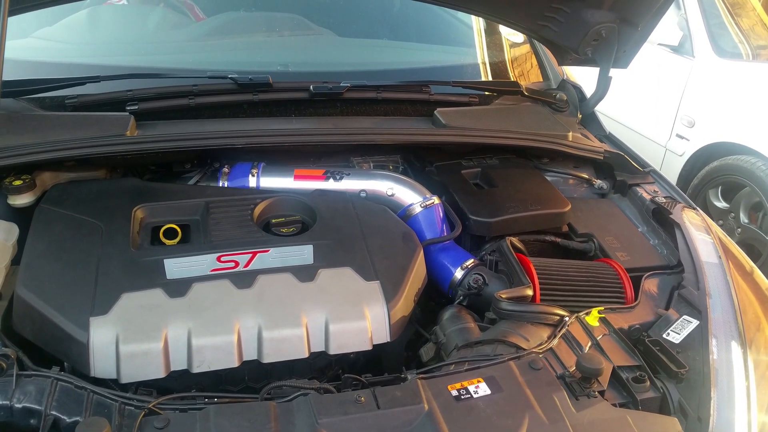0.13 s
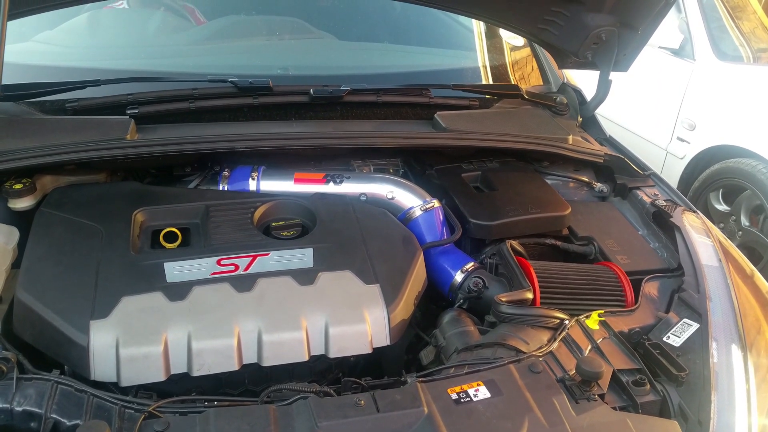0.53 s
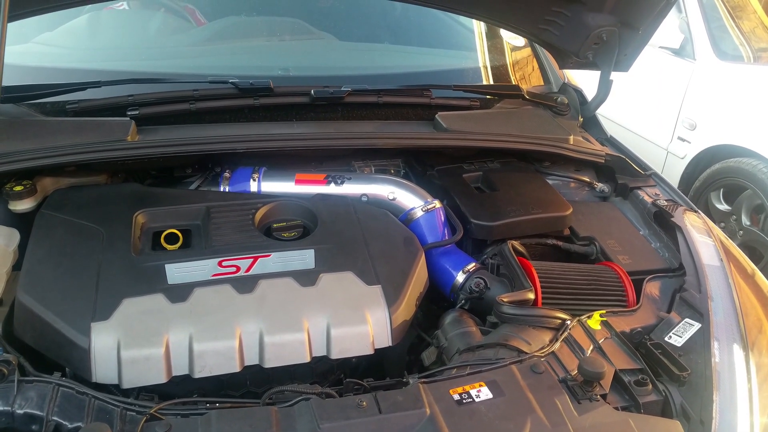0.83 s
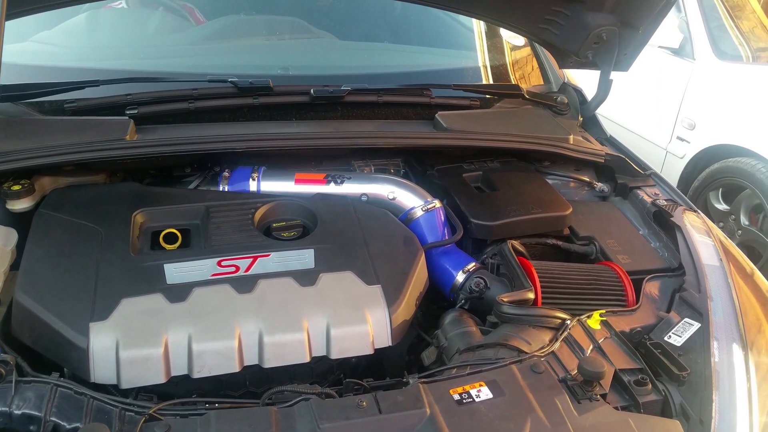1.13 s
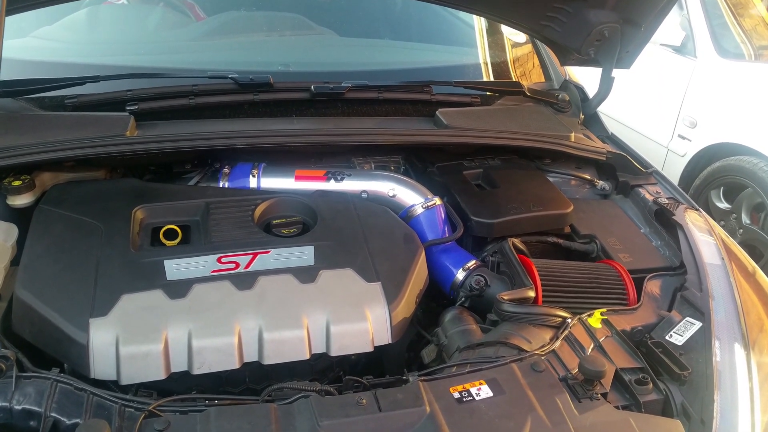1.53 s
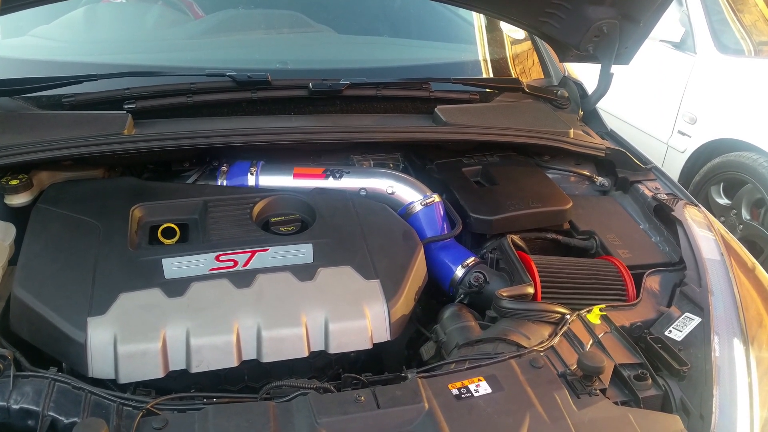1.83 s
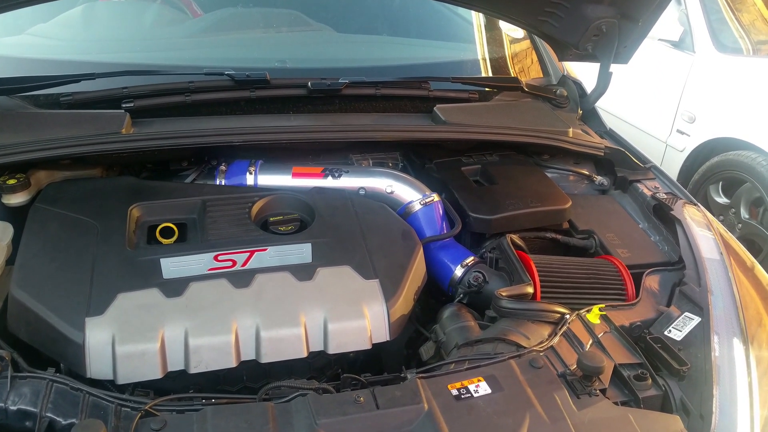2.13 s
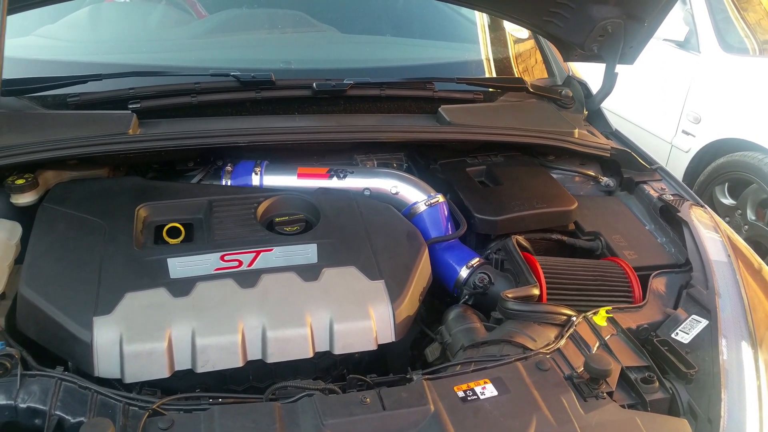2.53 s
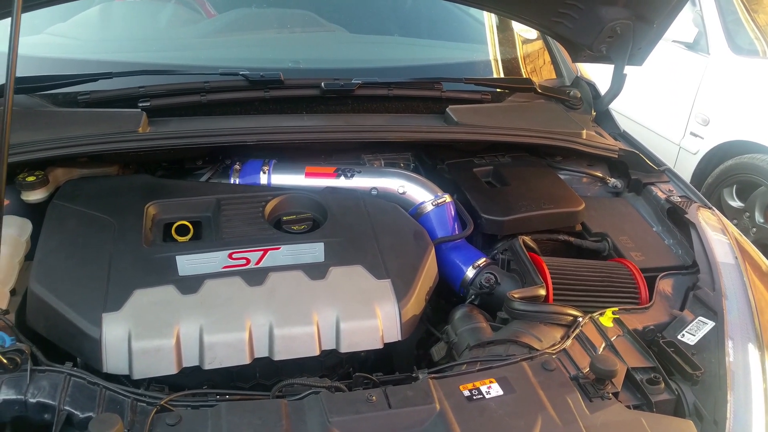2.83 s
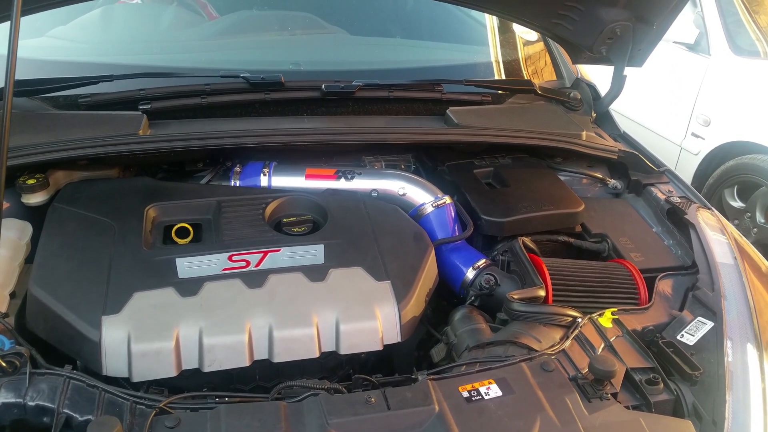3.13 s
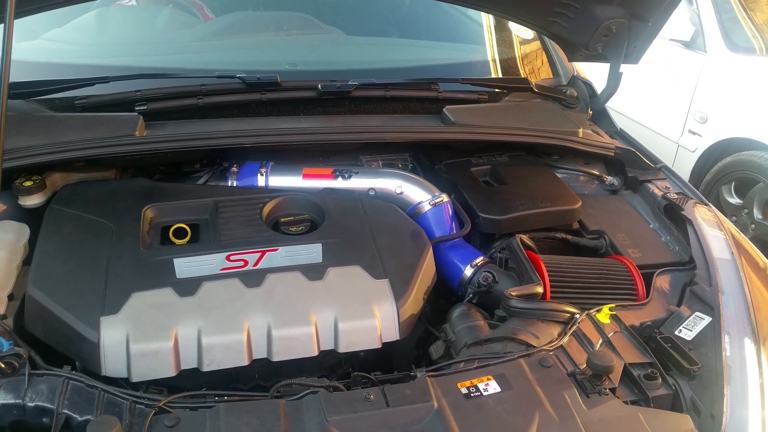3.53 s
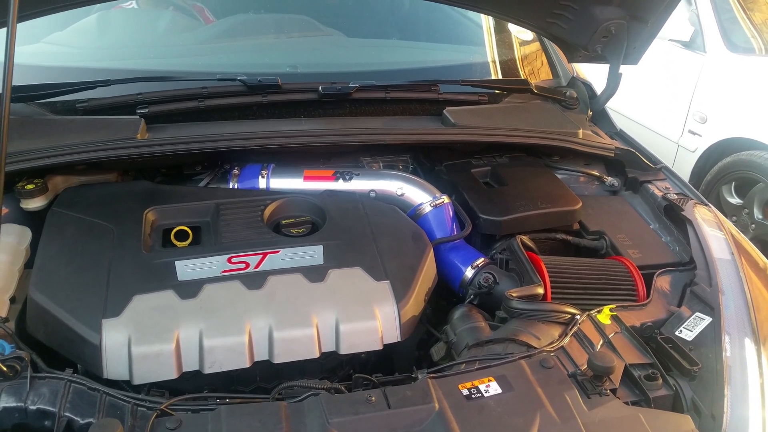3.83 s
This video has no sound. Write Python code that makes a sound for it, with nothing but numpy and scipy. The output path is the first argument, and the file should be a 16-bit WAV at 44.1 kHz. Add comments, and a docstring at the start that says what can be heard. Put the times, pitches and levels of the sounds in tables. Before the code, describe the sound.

A dog barks sharply and repeatedly over a car engine settling from a rev to idle.

```python
"""A dog's bark, already under way, over a fast-running engine that settles from a blip back to idle.
The engine, under an open bonnet, is filtered noise and tones that follow its turning: roar, clatter and hiss,
with injector and pump ticks coming out as it slows.
Each bark starts as a clean yelp built from sine waves and breaks into a rasp of noise through a ringing throat.
The yard throws the barks back as many scattered echoes."""
import sys
import numpy as np
from scipy import signal
from scipy.io import wavfile
from scipy.ndimage import uniform_filter1d

SR = 44100
rng = np.random.default_rng(int(sys.argv[2]) if len(sys.argv) > 2 else 0)


def persist_wave(psi):
    """Save psi, clipped to +-1, as 16-bit WAV."""
    counts = np.round(np.clip(psi, -1, 1) * 32767).astype(np.int16)
    wavfile.write(sys.argv[1], SR, np.atleast_2d(counts).T)


N = 176400  # length in samples


def amp(db):
    """Turn decibels into a multiplier for the wave."""
    return 10 ** (np.asarray(db) / 20)


def unit(x):
    """Scale a signal to an average (RMS) strength of 1."""
    return x / np.sqrt(np.mean(x ** 2) + 1e-20)


def soft_step(x, width):
    """Rise smoothly from 0 to 1 around x = 0; a negative width makes it fall."""
    return 1 / (1 + np.exp(-x / width))


def read(points, hz):
    """Look up a table of frequencies, sliding between rows on a logarithmic scale."""
    f, value = np.transpose(points)
    return np.interp(np.log(hz + 1), np.log(f + 1), value)


def curve(table, column):
    """Turn one column of a timed table into a line with a value for every sample."""
    rows = np.array(table)
    return np.interp(np.arange(N) / SR, rows[:, 0], rows[:, column])


def ring(x, modes):
    """Parallel resonances, each with its listed gain at its centre."""
    return sum(amp(db) * signal.lfilter(*signal.iirpeak(hz, hz / width, SR), x) for hz, width, db in modes)


def band_filter(order, hz, kind):
    """Design a filter that keeps one range of frequencies."""
    return signal.butter(order, hz, kind, fs=SR, output="sos")


# How alike left and right are: (frequency [Hz], likeness [0-1])
LIKENESS = [(60, 1), (290, 0.98), (630, 0.96), (1300, 0.96), (2300, 0.29), (4500, 0.26), (14500, 0.094)]
# Stereo balance: (frequency [Hz], left minus right [dB])
BALANCE = [(60, 4), (120, 0), (240, 3), (470, 2.5), (930, 2.5), (1850, 13.5), (3680, 2.5), (7300, -3.5),
           (14500, 3)]
ENGINE_LAG_S = 0.00018  # the right microphone hears the engine later


def noise(shape, patch_db=2):
    """Two-channel noise with a given spectrum, whose strength drifts in patches of time and pitch."""
    frames, hz = N // 256 + 5, np.fft.rfftfreq(1024, 1 / SR)
    a, b, c, d, patch = rng.standard_normal((frames, 513, 5)).T
    patch = uniform_filter1d(patch, size=10, axis=0)
    patch = unit(uniform_filter1d(patch, size=10, axis=1))
    same = np.clip(read(LIKENESS, hz), -1, 1)[:, None]
    left, other = a + 1j * b, c + 1j * d
    delay = np.exp(-2j * np.pi * hz * ENGINE_LAG_S)[:, None]
    right = same * left * delay + np.sqrt(1 - same ** 2) * other
    balance_db = np.multiply.outer([.5, -.5], read(BALANCE, hz))[..., None]
    z = np.array([left, right]) * amp(read(shape, hz)[:, None] + patch_db * patch + balance_db)
    return unit(signal.istft(z, nperseg=1024, noverlap=768)[1][:, :N])


# Engine speed; four firings to a cycle: (time [s], speed [cycles per s])
SPEED = [(0, 13.807), (0.26, 13.502), (0.5, 13.074), (0.77, 12.457), (1, 11.729), (1.29, 10.831),
         (1.65, 9.878), (2.03, 8.989), (2.58, 8.096), (2.99, 7.516), (3.4, 7.272), (4, 7.06)]


def engine():
    """Adding up the speed gives the place in the cycle, which times the throbs, ticks and tones."""
    t, cycles = np.arange(N) / SR, np.cumsum(curve(SPEED, column=1)) / SR
    return (roar(cycles) + clatter_and_ticks(t, cycles) + intake_hiss(t, cycles) + hum_and_whine(cycles)
            + exhaust_pops(t) + loose_click())


# Engine levels: (time [s], rumble level [dB], roar level [dB], firing hum level [dB])
ENGINE_LEVELS = [(0, -27, -15, -65), (.12, -31, -18, -46), (.25, -28, -18, -36.5), (.45, -32.5, -20.5, -58),
                 (.55, -33.5, -25, -40), (.79, -30.5, -25, -48.5), (.97, -34.5, -28.5, -49),
                 (1.25, -36, -33, -44.5), (1.45, -44.5, -31, -52), (1.65, -38.5, -32, -41),
                 (1.9, -45.5, -31, -41), (2.05, -46.5, -32, -44), (2.4, -50, -40, -49.5),
                 (3, -52.5, -38, -51.5), (4, -54.5, -42.5, -49)]
# Colour of the roar: (frequency [Hz], level [dB])
ROAR_COLOUR = [(15, -61), (25, -54), (60, -40), (100, -14.5), (230, -4), (270, -27), (344, -5.5),
               (654, -9.5), (1420, -0.5), (4370, -15), (7460, -39), (12700, -32), (15000, -54)]
# Booming resonances of the roar: (frequency [Hz], width [Hz], relative level [dB])
ROAR_BOOM = [(332, 35, -4), (235.6, 26, -9.5), (1520, 42, -18.5), (905, 140, -9.5)]
THROB_DB, SPLIT_HZ = 0.5, 450  # swing with each firing; rumble below the split, roar above
BOOM_LUMP_DB, BOOM_AT = 1.5, 0.48  # the boom swells once a cycle, at this place in it [0-1]


def roar(cycles):
    """Noise that throbs with the firings and excites a few resonances; low and high parts have own levels."""
    source = noise(ROAR_COLOUR)
    lump = amp(BOOM_LUMP_DB * np.cos(2 * np.pi * (cycles - BOOM_AT)))
    boom = 3 * lump * ring(source, ROAR_BOOM)
    full = amp(THROB_DB * np.cos(8 * np.pi * cycles)) * (source + boom)
    low = signal.sosfiltfilt(band_filter(3, SPLIT_HZ, "low"), full)
    rumble = amp(curve(ENGINE_LEVELS, column=1)) * unit(low)
    return rumble + amp(curve(ENGINE_LEVELS, column=2)) * unit(full - low)


TICK_HOLD_S, TICK_SPREAD_DB = 0.013, 1.2


def bursts(turns, db, decay_s):
    """An envelope that jumps up, holds and decays at each whole turn, a little uneven in strength."""
    new_turn = np.diff(np.floor(turns), prepend=np.floor(turns[0]))
    hit = new_turn * amp(db + TICK_SPREAD_DB * rng.standard_normal(N))
    hold = 1. * (np.arange(SR // 20) < TICK_HOLD_S * SR)
    held = hit + signal.oaconvolve(hit, hold)[:N] / (decay_s * SR)
    decaying = signal.lfilter([1], [1, -np.exp(-1 / (decay_s * SR))], held)
    return uniform_filter1d(decaying, size=40)


# Resonances rung by the injectors: (frequency [Hz], width [Hz], relative level [dB])
INJECTOR_RING = [(2354, 87, 4), (4125, 130, 0), (3400, 130, -16.5), (4740, 82, -15.5)]
# Clear notes of each tick: (frequency [Hz], relative level [dB])
TICK_NOTES = [(2330, -3), (4140, 0)]
PING_DRIFT = .06  # phase drift [radians a sample]


def injector_ticks(t, strokes, flat):
    """Bursts of ringing noise plus drifting clear notes, both shaped by the strokes."""
    rattle = ring(strokes * noise(flat, patch_db=-3.0), INJECTOR_RING)
    drift = PING_DRIFT * np.cumsum(rng.standard_normal((2, N)), axis=1)
    notes = sum(amp(db) * np.sin(2 * np.pi * hz * t + drift) for hz, db in TICK_NOTES)
    return unit(rattle) + unit(strokes) * notes


# Fuel pump parts: (lag [cycles], relative level [dB], frequency [Hz], width of each filter [Hz])
PUMP = [(-0.027, -1.5, 5250, 950), (-0.062, -8.5, 12800, 3700)]
PUMP_S = .004  # decay of a pump tick


def pump_ticks(cycles, flat):
    """Three lobes a cycle give noise bursts, each part filtered twice around its own frequency."""
    white, total = noise(flat, patch_db=1), 0
    for lag, db, hz, width in PUMP:
        burst = bursts(3 * (cycles - lag), db, PUMP_S) * white
        total = total + ring(ring(burst, [(hz, width, 0)]), [(hz, width, 0)])
    return total


# Colour of the clatter: (frequency [Hz], level [dB])
CLATTER_COLOUR = [(15, -40), (25, -7.5), (196, -16), (335, -17), (393, -29.5), (500, 2), (572, -12),
                  (636, -5.5), (690, -8), (1460, -11), (2060, -11.5), (4140, -9.5), (7260, -32),
                  (11800, -23), (15000, -41.5)]
# Casing resonances rung by the clatter: (frequency [Hz], width [Hz], relative level [dB])
CASING = [(511, 15, -19.5), (1340, 24, -31), (1500, 15, -7), (2330, 57, -10), (4060, 66, -15)]
# Injector ticks: (place in the cycle [0-1], relative level [dB])
INJECTOR_TICKS = [(0.91, 2.5), (.27, -3), (.19, -9), (0.5, 2.5)]
# Shared level of clatter and ticks, before their own boosts: (time [s], level [dB])
CLATTER_LEVEL = [(0, -35), (.25, -34), (.47, -31.5), (.52, -34), (.95, -35), (1.1, -35.5), (1.4, -37),
                 (1.62, -35.5), (1.95, -34), (2.03, -38.5), (2.3, -39.5), (2.9, -40), (3.2, -39),
                 (3.6, -40), (4, -39.5)]
CLATTER_DB, INJECT_DB = 6.5, 1  # boosts of the clatter and of the injector ticks
INJECT_S, INJECT_SHAKE = 0.0032, 0.61  # decay of a tick; how strongly it also shakes the clatter
TICKS_FROM_S, TICKS_FADE_S = 1.3, 0.93  # middle and time constant of the ticks' slow rise


def clatter_and_ticks(t, cycles):
    """Noise rings the casing; injector and pump ticks gradually come out and share its level."""
    flat = [(20, 0), (20000, 0)]
    showing = soft_step(t - TICKS_FROM_S, TICKS_FADE_S)
    strokes = sum(bursts(cycles - at, db, INJECT_S) for at, db in INJECTOR_TICKS)
    clatter = unit(noise(CLATTER_COLOUR) * (1 + INJECT_SHAKE * showing * strokes))
    clatter = amp(CLATTER_DB) * (clatter + 3 * ring(clatter, CASING))
    injectors = amp(INJECT_DB) * unit(injector_ticks(t, strokes, flat))
    ticks = (injectors + 4 * pump_ticks(cycles, flat)) * showing
    return amp(curve(CLATTER_LEVEL, column=1)) * (clatter + ticks)


# Colour of the intake hiss: (frequency [Hz], level [dB])
PUFF_COLOUR = [(1760, -33), (3000, -11), (4640, 9), (7430, -8.5), (12700, 0), (15000, -42)]
PUFF_DB, PUFF_DEPTH_DB = -35.5, 6  # middle level and swing either way
PUFF_AT, PUFF_END_S = 0.24, 0.49  # loudest place in the cycle [0-1]; middle of the fade-out


def intake_hiss(t, cycles):
    """Noise that swells once a cycle and soon fades away."""
    level_db = PUFF_DB + PUFF_DEPTH_DB * np.cos(2 * np.pi * (cycles - PUFF_AT))
    return amp(level_db) * soft_step(t - PUFF_END_S, -0.071) * noise(PUFF_COLOUR)


# Gear whine: (time [s], level [dB])
WHINE_LEVEL = [(0, -60), (1.45, -52), (1.65, -39), (1.9, -40), (2.2, -47), (2.5, -42), (2.75, -41),
               (2.95, -42), (3.3, -48), (4, -50)]
WHINE_ORDER, HUM_SECOND_DB = 80, -5  # whine waves per cycle; second hum tone against the first


def hum_and_whine(cycles):
    """Sine waves locked to the engine: a hum at the firing rate and its double, and a high gear whine."""
    hum = np.sin(8 * np.pi * cycles) + amp(HUM_SECOND_DB) * np.sin(16 * np.pi * cycles)
    whine = np.sin(2 * np.pi * WHINE_ORDER * cycles)
    hum = amp(curve(ENGINE_LEVELS, column=3)) * hum
    return np.sqrt(2) * (amp(curve(WHINE_LEVEL, column=1)) * whine + hum)


# Uneven exhaust thumps after the blip: (time [s], level [dB])
POPS = [(0.072, -16.5), (0.096, -20), (0.149, -18), (0.175, -16), (0.223, -18), (0.306, -32), (0.361, -21),
        (0.402, -22), (0.462, -19), (0.581, -29), (0.684, -20.5), (0.874, -32)]
POP_HZ, POP_RISE_S, POP_FALL_S = 336.6, 0.0163, 0.009


def exhaust_pops(t):
    """Short thumps of the exhaust pipe's resonance, each slightly different in pitch."""
    out = np.zeros(N)
    for (middle_s, db), (bend, phase) in zip(POPS, rng.standard_normal((len(POPS), 2))):
        u = np.maximum(t - middle_s + POP_RISE_S / 2, 0)  # the listed time is the middle of the rise
        rise = np.sin(np.pi / 2 * np.minimum(u / POP_RISE_S, 1)) ** 2
        fall = np.exp(-np.maximum(u - POP_RISE_S, 0) / POP_FALL_S)
        out += amp(db) * rise * fall * np.sin(2 * np.pi * POP_HZ * (1 + 0.032 * bend) * u + phase)
    return out


# Resonances of the click: (frequency [Hz], width of each filter [Hz], gain of each filter [dB])
CLICK_RING = [(2500, 650, 0), (3300, 700, -5)]
CLICK_S, CLICK_DB = 2.4506, 9  # time; height of the impulse before the filters


def loose_click():
    """One loose click: a single impulse rung twice through the same resonances."""
    impulse = amp(CLICK_DB) * (np.arange(N) == round(CLICK_S * SR))
    return ring(ring(impulse, CLICK_RING), CLICK_RING)


# Throat resonances: (frequency [Hz], width [Hz], relative level [dB])
THROAT = [(538, 46, -6.5), (686, 73, 3), (898, 104, 0), (992, 110, 3), (1200, 110, -4.5), (1440, 135, -4),
          (1755, 115, -2.5), (2017, 51, -9.5)]
THROAT_SPREAD = .03  # share by which the throat's frequencies vary from bark to bark
SLAPS_PER_S, SLAP_SPREAD_DB, SLAP_SHARE = 600, 3.5, .5  # irregular slaps of the vocal folds
RASP_RISE_S, RASP_SAG_DB, GRIT_DB = .022, -11, 2.8


def rasp_sound(t, rasp_db, from_s, end_s):
    """Gritty noise and irregular slaps of the vocal folds ring the throat, then sag and stop."""
    grit, hiss = rng.standard_normal((2, len(t)))
    slaps = amp(SLAP_SPREAD_DB * hiss) * (rng.random(len(t)) < SLAPS_PER_S / SR)
    gate = amp(GRIT_DB * unit(uniform_filter1d(grit, size=160)))
    shifts = rng.standard_normal((len(THROAT), 2))
    throat = [(hz * (1 + THROAT_SPREAD * z), width, db + 1.4 * v)
              for (hz, width, db), (z, v) in zip(THROAT, shifts)]
    folds = (1 - SLAP_SHARE) * unit(gate * hiss) - SLAP_SHARE * unit(slaps)
    rasp = unit(signal.sosfilt(band_filter(7, [430, 2250], "band"), ring(folds, throat)))
    shape = np.clip((t - from_s) / RASP_RISE_S, 0, 1) * soft_step(t - end_s, -.005)
    sag = np.clip((t - from_s - RASP_RISE_S) / end_s, 0, 1)
    return rasp * shape * amp(rasp_db + RASP_SAG_DB * sag)


def slow_wobble(count):
    """Random wandering, smoothed twice so only slow changes are left."""
    chance = uniform_filter1d(rng.standard_normal(count), size=170)
    return unit(uniform_filter1d(chance, size=170))


# Second and third partials of the yelp, against the first: level [dB]
UPPER_PARTIALS_DB = [-16.5, -13.5]
# Half-pitch tones from strong-weak pulsing: (multiple of the pitch, relative level [dB])
HALVES = [(1.5, 0), (2.5, -9)]
# Barks, inner times counted from each start: (start [s], top pitch [Hz], swell time [s], yelp end [s],
# yelp level [dB], growth: level early in the yelp against its end [dB], half-pitch level [dB],
# squeak level [dB], fourth partial level [dB], rasp level [dB], rasp start [s], rasp end [s])
BARKS = [(-.02, 696, 0.021, 0.066, -18, -7.5, -35, -36, -48, -20.5, 0.037, 0.13),
         (0.481, 723, 0.023, 0.056, -13.5, -4, -14, -29, -43, -13.5, 0.05, 0.14),
         (0.976, 695, 0.027, .082, -12, -7, -17.5, -22, -38, -13, 0.043, 0.14),
         (1.46, 681.6, 0.023, 0.059, -9, -5, -18, -23, -43, -12, 0.038, 0.12),
         (1.962, 720, 0.032, 0.065, -9, -1.5, -16, -21, -40, -15, 0.053, .14),
         (2.913, 709.7, 0.026, 0.0664, -12, -6.5, -21, -23, -35, -12.5, 0.038, 0.13),
         (3.309, 664.4, 0.027, 0.08, -10, -4.5, -19, -21.5, -34.5, -15.5, .045, .14),
         (3.717, 672, 0.023, 0.045, -12, -5, -19, -42, -47, -11.5, 0.043, 0.14)]
SCOOP, SCOOP_S = .18, .013  # the pitch starts this share too low and rises with this time constant
WOBBLE_DB, WOBBLE_PITCH = 2, .014  # random wobble of level [dB] and pitch [share]
SQUEAK_S, SQUEAK_RISE_S = .026, .007
HALVES_FROM_S, FOURTH_AT_S, FOURTH_S = .045, .03, .014


def bark(start, top_hz, swell_s, yelp_s, yelp_db, growth_db, half_db, squeak_db, fourth_db, rasp_db,
         rasp_from_s, rasp_end_s):
    """Pitch scoops up; the second partial speaks first, the first swells, half-pitch tones and rasp follow."""
    t = np.arange(0, .25, 1 / SR)
    pitch_change = WOBBLE_PITCH * slow_wobble(len(t)) - SCOOP * np.exp(-t / SCOOP_S)
    turns = np.cumsum(top_hz * (1 + pitch_change)) / SR

    def partial(k):
        return np.sin(2 * np.pi * k * turns)

    hold = soft_step(t - yelp_s, -.0025)
    growth = growth_db * np.clip((yelp_s - t) / (yelp_s - swell_s), 0, 1)
    onset = np.minimum(t / SQUEAK_RISE_S, 1)
    swell = amp(yelp_db + WOBBLE_DB * slow_wobble(len(t)) + growth) * hold
    swell *= amp(-18) * onset + soft_step(t - swell_s, 0.002)
    upper = sum(amp(db) * partial(k) for k, db in enumerate(UPPER_PARTIALS_DB, start=2))
    yelp = swell * (partial(1) + upper)
    halves = sum(amp(db) * partial(k) for k, db in HALVES)
    halves = amp(half_db) * hold * soft_step(t - HALVES_FROM_S, 0.0029) * halves
    squeak = amp(squeak_db) * onset * np.exp(-(t / SQUEAK_S) ** 2) * partial(2)
    fourth = amp(fourth_db) * np.exp(-((t - FOURTH_AT_S) / FOURTH_S) ** 2) * partial(4)
    rasp = rasp_sound(t, rasp_db, rasp_from_s, rasp_end_s)
    out = np.zeros(N + 2 * SR)  # one spare second at each end
    at = round((start + 1) * SR)
    out[at:at + len(t)] = np.sqrt(2) * (yelp + squeak + fourth + halves) + rasp
    return out


# Lift at the left microphone, which faces the dog: (frequency [Hz], width [Hz], level [dB])
FACING = [(1530, 420, -2)]
DOG_PAN_DB, DOG_LAG = 5.5, 14  # left minus right, before the lift; delay of the left channel [samples]


def dog_at_microphones():
    """All barks placed between two microphones by level, a small delay and a lift on the left."""
    dog = sum(bark(*row) for row in BARKS)
    left = np.roll(dog + ring(dog, FACING), DOG_LAG)
    return np.array([left, dog]) * amp([[DOG_PAN_DB / 2], [-DOG_PAN_DB / 2]])


YARD_GAP_S, YARD_T60_S = 0.013, .33  # wait before the first echo; time for echoes to fall by 60 dB


def yard(x):
    """Reflections off cars and walls: sparse taps of random sign, different for each ear."""
    t = np.arange(SR // 2) / SR
    signs = rng.choice([-1., 1.], (2, len(t)))
    present = rng.random((2, len(t))) < .03
    taps = signs * present * (t > YARD_GAP_S) * amp(-60 * t / YARD_T60_S)
    taps /= np.linalg.norm(taps, axis=1, keepdims=True)
    return signal.fftconvolve(x[None], taps, axes=1)


YARD_DB = -9


def scene():
    """Add the engine, the barks and their echoes in the yard."""
    direct = dog_at_microphones()
    inside = slice(SR, SR + N)  # drops the spare second before the start
    return engine() + direct[:, inside] + amp(YARD_DB) * yard(direct[0])[:, inside]


# Threshold; share of the excess taken away; how fast the tracked peak falls back
DUCK_FROM_DB, DUCK_SHARE, RECOVER_DB_PER_S = -14.5, 0.38, 56
CEILING, MIC_LOW_HZ, EDGE_HZ = 1.2, 36, 15000  # overload level; lower and upper band limits


def record(dry):
    """Gain control ducks everything under loud moments; soft overload, then the band limits."""
    power_db = 10 * np.log10(abs(uniform_filter1d((dry ** 2).mean(0), size=600)) + 1e-12)
    fall = np.arange(N) * RECOVER_DB_PER_S / SR
    held_db = np.maximum.accumulate(power_db + fall) - fall  # follows rises at once, falls back steadily
    over_db = np.maximum(held_db - DUCK_FROM_DB, 0)
    ducked = dry / amp(DUCK_SHARE * uniform_filter1d(over_db, size=300))
    rounded = CEILING * np.tanh(ducked / CEILING)
    trimmed = signal.sosfilt(band_filter(2, MIC_LOW_HZ, "high"), rounded)
    treble_cut = signal.firwin(511, EDGE_HZ, window=("kaiser", 9), fs=SR)
    return signal.oaconvolve(trimmed, treble_cut[None], "same")


dry = scene()
out = record(dry)
persist_wave(out)
```